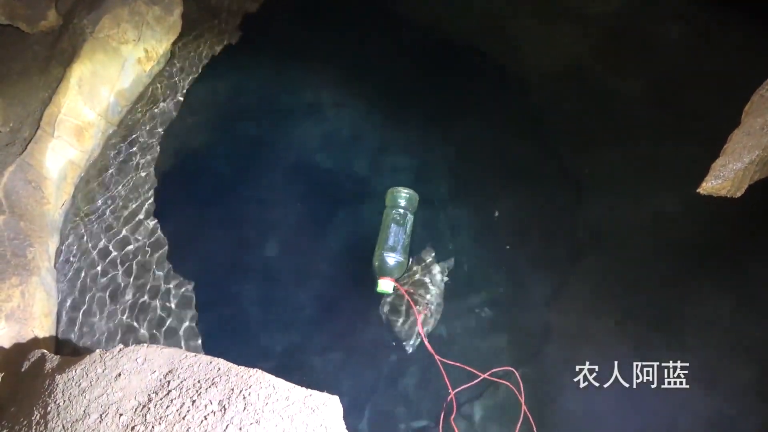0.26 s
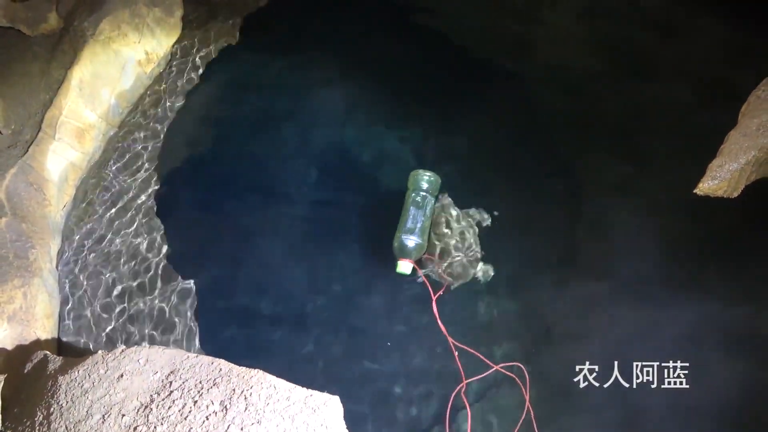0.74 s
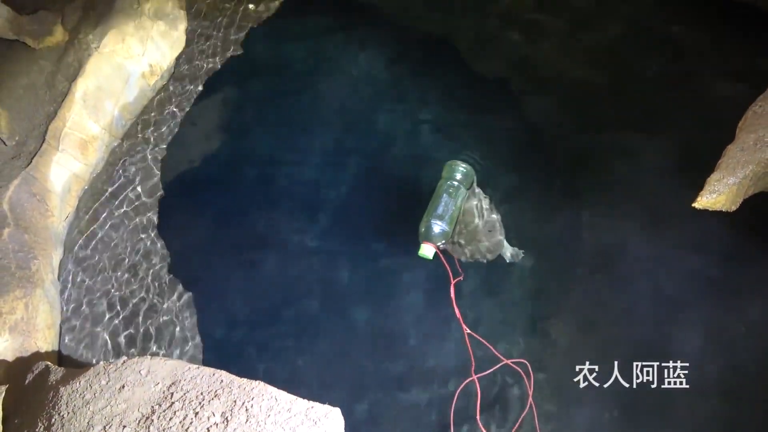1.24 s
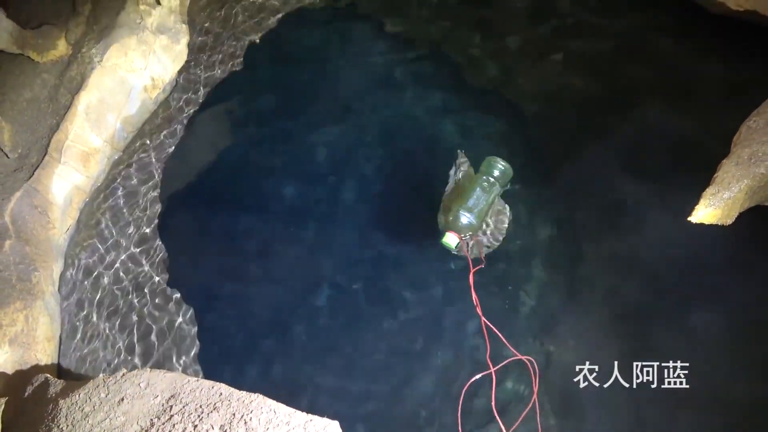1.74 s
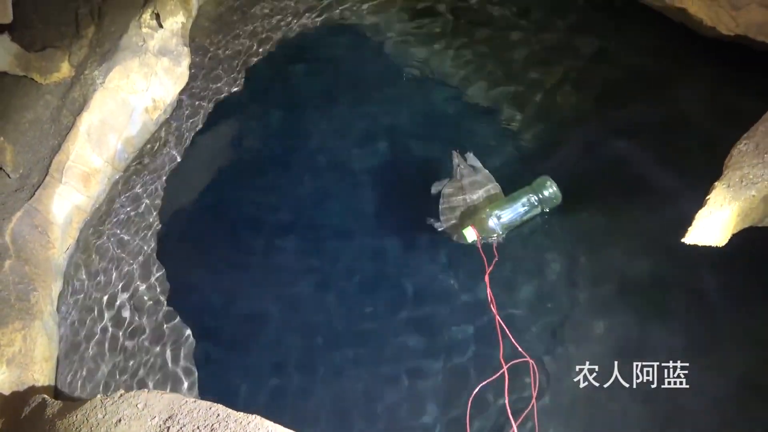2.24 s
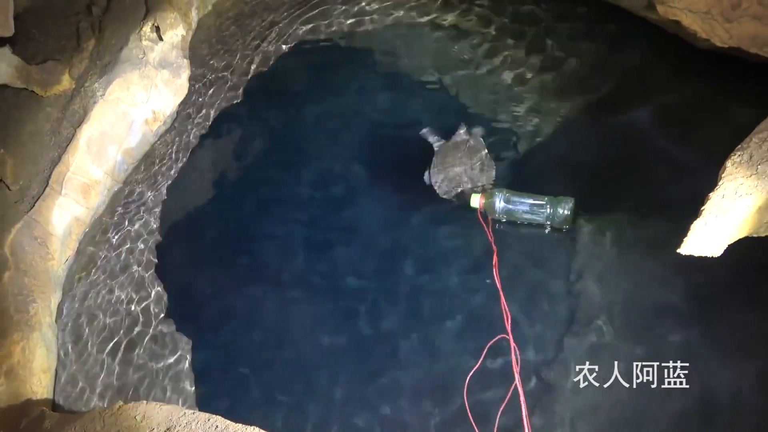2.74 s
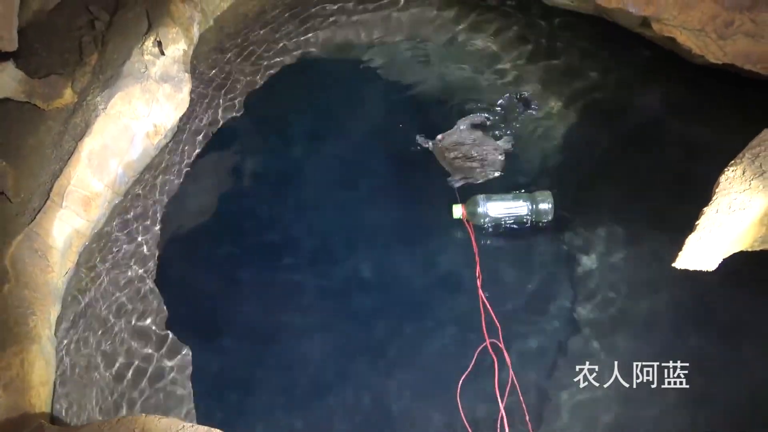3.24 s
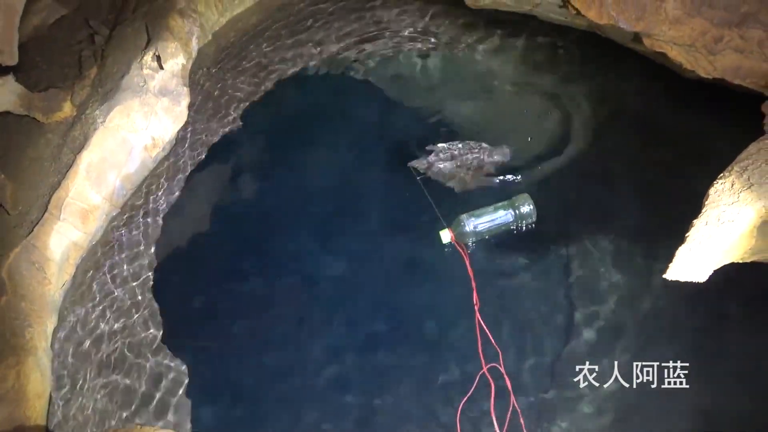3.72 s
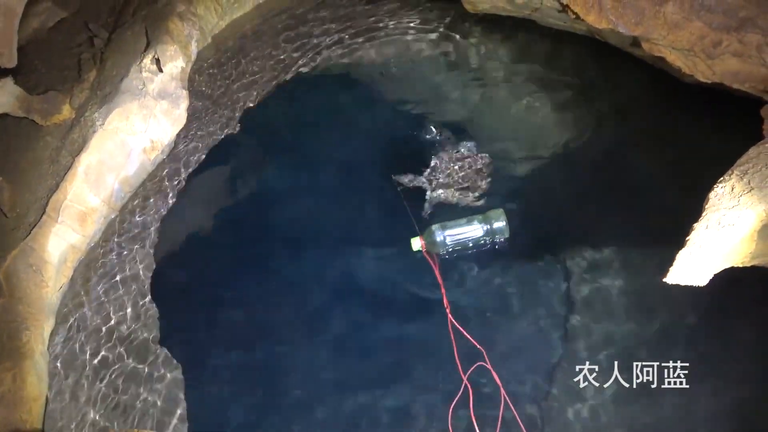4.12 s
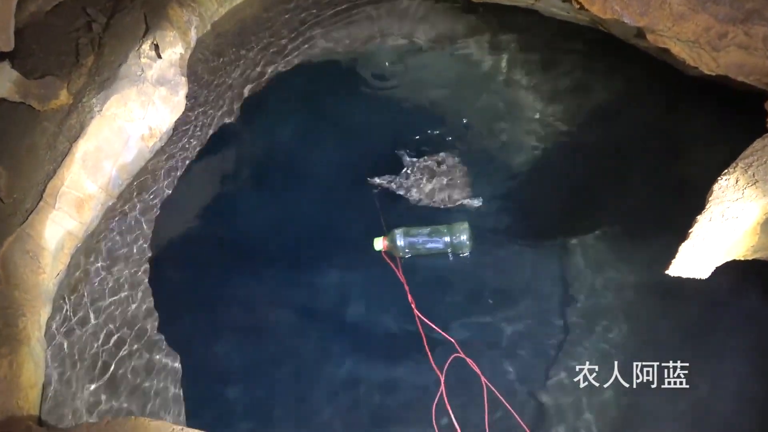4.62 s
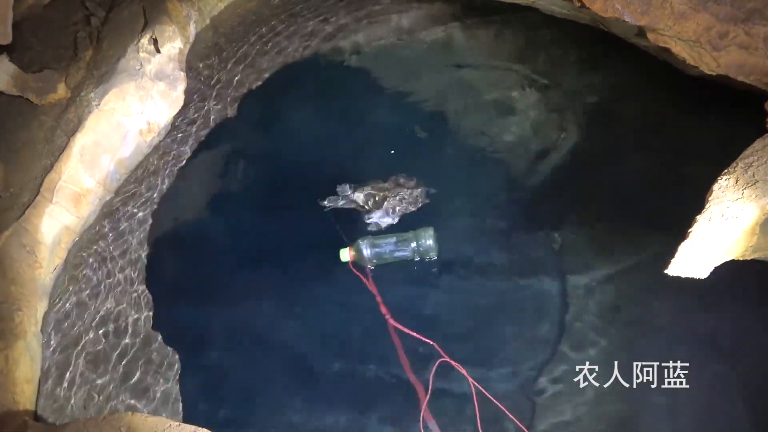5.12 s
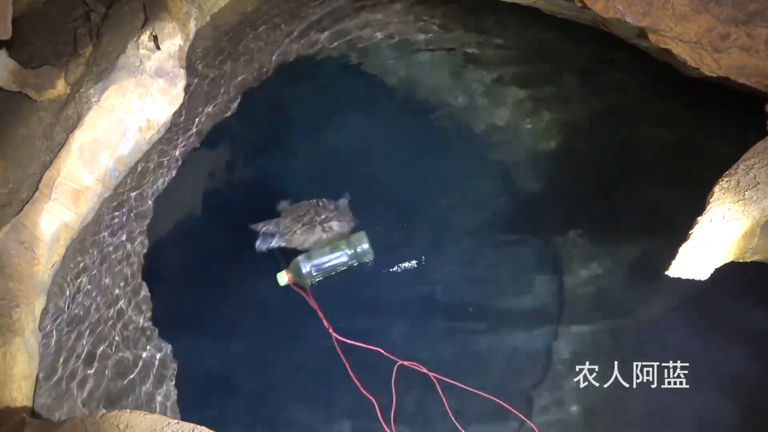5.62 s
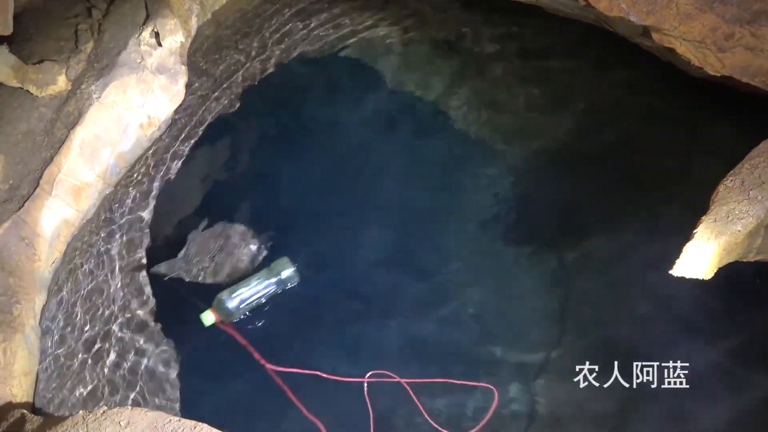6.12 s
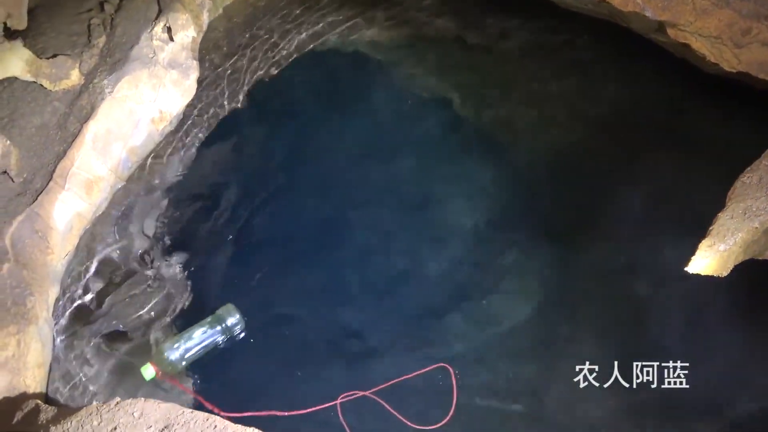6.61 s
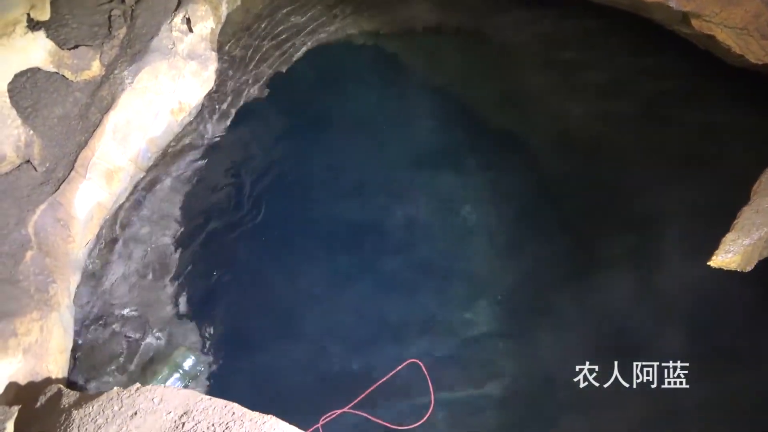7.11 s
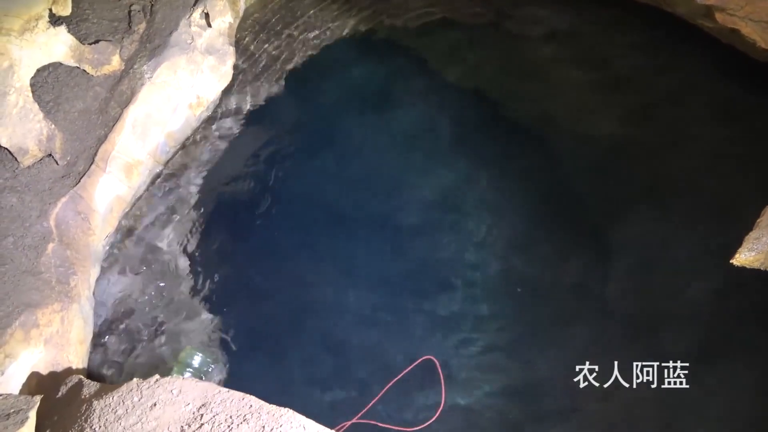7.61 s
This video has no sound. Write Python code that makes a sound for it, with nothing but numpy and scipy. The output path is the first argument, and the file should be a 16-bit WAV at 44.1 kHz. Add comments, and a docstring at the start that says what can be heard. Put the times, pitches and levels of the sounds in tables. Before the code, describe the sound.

Bright drops ring in a rocky pool, a dry snap, hollow knocks, then bursts of plopping, bubbling and fizzing over thin electrical whine.

```python
"""A turtle paddles in a small rock pool inside a cave, beside a floating plastic bottle.
A low hush and a thin electrical whine run throughout. At first drops plink as trapped bubbles ring,
spray ticks, low slops surge and one dry snap cracks close by; then hollow knocks sound as resonant modes.
From about three seconds, repeated strokes bring clusters of plops, three-bubble glugs, gurgle and fizz,
with more drops between them; delayed copies and decaying noise give every water sound a short echo."""
import sys
import numpy as np
from scipy import signal
from scipy.fft import rfft, irfft
from scipy.io import wavfile
from scipy.ndimage import uniform_filter1d

SR = 44100
rng = np.random.default_rng(int(sys.argv[2]) if len(sys.argv) > 2 else 0)


def transcribe(u):
    """Save the signal u as a 16-bit wav file named by the first command-line argument.

    u: samples, shape (n,) or (channels, n), limited to [-1, 1]; the rate is SR.
    q: integer samples, one column per channel.
    """
    v = np.clip(np.atleast_2d(u).T, -1, 1)
    q = np.round(v * 32767).astype(np.int16)
    wavfile.write(sys.argv[1], SR, q)


N = 346493
TIME = np.arange(N) / SR
EDGE_HZ = 16000  # recorder's upper band edge, also the highest starting pitch of the froth


def amp(db):
    """Decibel law: 20 dB is a factor of ten in amplitude."""
    return 10 ** (np.asarray(db) / 20)


def unit(x):
    """Power normalization: scales to rms 1."""
    return x / np.sqrt(np.mean(x ** 2) + 1e-20)


def read(points, hz):
    """Logarithmic frequency scale: interpolates a spectrum table along it."""
    f, value = np.transpose(points)
    return np.interp(np.log(hz + 1), np.log(f + 1), value)


def curve(rows, column=1):
    """Linear interpolation in time: one column of a table, at every sample."""
    rows = np.array(rows)
    return np.interp(TIME, rows[:, 0], rows[:, column])


def add(mix, s, sound):
    """Superposition: lays a sound into the mix at s seconds."""
    part = mix[max(round(s * SR), 0):][:len(sound)]
    part += sound[:len(part)]


def colour(x, points):
    """Linear filtering: multiplies the spectrum by a table of gains in dB."""
    gain = amp(read(points, np.fft.rfftfreq(N, 1 / SR)))
    return irfft(rfft(x) * gain, N)


def burst(swell, decay):
    """Exponential damping: half a second of smooth swell to 1, then decay."""
    t = TIME[:SR // 2]
    rise = np.sin(np.pi / 2 * np.minimum(t / swell, 1)) ** 2
    return rise * np.exp(-np.maximum(t - swell, 0) / decay)


def random_sizes(per_s, size_db, most):
    """Poisson-like arrivals: random instants with exponential levels in dB, up to a limit."""
    arrivals = rng.random(N) < per_s / SR
    return arrivals * amp(size_db * np.minimum(rng.exponential(1, N), most))


def ring(hz, decay, swell, rise=0.04, most_rise=1.0):
    """Bubble resonance: a damped sine whose pitch climbs as the bubble nears the surface."""
    t = TIME[:SR // 5]
    pitch = hz * (1 + most_rise * np.tanh(rise * t / decay / most_rise))
    return burst(swell, decay)[:len(t)] * np.sin(2 * np.pi * np.cumsum(pitch) / SR)


# A drip's bubble swells and decays in the same number of cycles at any pitch.
DRIP_SWELL_CYCLES, DRIP_DECAY_CYCLES = 3.6, 10.5
# Swell and decay are for 1 kHz; larger, lower bubbles swell and ring longer.
BUBBLE_SWELL_S, BUBBLE_DECAY_S, BUBBLE_SIZE_POWER = 0.0025, .0055, .35
GLUG_ENDS_DB = -4  # the first and last bubble against the middle one, before the step per bubble
# Drops that hit the pool and each trap one bubble. Each row: start in seconds, starting pitch in Hz,
# ring level in dB, relative impact level in dB, impact decay time in seconds.
DRIPS = [(0.1922, 5380, -35.5, -36, 0.0007), (0.8059, 1710, -23, -36, 0.0055),
         (1.1055, 1406, -52, -42, 0.0012), (1.259, 3020, -46, -44, 0.0041),
         (1.3461, 3230, -50.5, -35, 0.00096), (2.1466, 4555, -30.5, -35, 0.0028),
         (2.3087, 8200, -43, -51, 0.00049), (4.0386, 4700, -30, -36, 0.0011),
         (4.3804, 4460, -29, -32.5, 0.0016), (4.5436, 2450, -41.5, -37, 0.00063),
         (5.466, 2320, -37.5, -43, 0.0027), (6.553, 2397, -41, -42.5, 0.00098),
         (6.77, 8830, -38.5, -38, 0.00035), (7.376, 2350, -41.5, -36.5, 0.0024)]
# Air pockets that break into three ever smaller bubbles. Each row: start in seconds, first pitch in Hz,
# level of the middle bubble in dB, gap in seconds, pitch ratio per bubble, level step in dB per bubble.
GLUGS = [(3.238, 1390, -28.5, 0.011, 1.15, -4), (3.297, 712, -33, 0.014, 1.28, -0.5),
         (4.211, 268, -35, .025, 1.15, 0.5), (4.257, 545, -25.5, .0105, 1.216, -6),
         (6.371, 798, -45, .022, 1.16, -0.5), (7.266, 1081, -33, 0.0069, 1.39, 0.5),
         (7.552, 626, -31.5, .023, 1.27, -5.5)]
# Single bubbles stirred under by the flippers. Each row: start in seconds, starting pitch in Hz,
# peak level in dB.
BUBBLES = [(.812, 1920, -37), (.824, 2055, -36.5), (1.266, 2790, -47.5), (3.202, 1398, -37),
           (3.221, 5940, -44), (3.248, 4780, -33.5), (3.301, 2910, -37), (3.3067, 9270, -26),
           (3.307, 6830, -28), (3.328, 2700, -36), (3.383, 657, -37), (3.399, 738, -31), (4.138, 1890, -46),
           (4.177, 7540, -54), (4.246, 543, -39), (4.265, 3450, -39), (4.286, 1390, -39),
           (4.294, 5580, -47.5), (4.323, 2120, -43.5), (4.325, 1520, -37), (5.364, 4730, -47),
           (5.38, 7840, -41), (5.39, 1177, -42), (5.392, 2005, -41), (6.365, 1880, -34.5),
           (6.413, 4330, -30), (6.419, 2620, -39.5), (6.445, 4770, -40), (6.711, 3210, -45.5),
           (6.713, 4400, -40), (7.099, 1283, -42.5), (7.101, 6500, -33.5), (7.23, 3920, -51),
           (7.27, 6860, -40), (7.412, 1710, -38), (7.437, 1700, -45), (7.474, 1786, -42.5),
           (7.485, 3880, -44.5), (7.52, 850, -42), (7.53, 587, -37), (7.547, 5580, -41),
           (7.583, 9840, -34.5), (7.586, 3180, -45.5), (7.626, 1070, -38)]


def all_bubbles():
    """Size scaling: rows of start s, pitch Hz, level dB, decay s and swell s; low bubbles last longer."""
    stirred = list(BUBBLES)
    for s, hz, db, gap, ratio, step_db in GLUGS:
        for k in range(3):
            level = db + step_db * (k - 1) + GLUG_ENDS_DB * abs(k - 1)
            stirred.append((s + k * gap, hz * ratio ** k, level))
    rows = [(s, hz, db, DRIP_DECAY_CYCLES / hz, DRIP_SWELL_CYCLES / hz) for s, hz, db, _, _ in DRIPS]
    for s, hz, db in stirred:
        slow = (1000 / hz) ** BUBBLE_SIZE_POWER
        rows.append((s, hz, db, BUBBLE_DECAY_S * slow, BUBBLE_SWELL_S * slow))
    return rows


def bubbles(froth_db=-10, froth_octaves=0.78, froth_tilt_db=-17, froth_cycles=5, scatter=1.6,
            spatter_s=0.0086, small_gain_db=15.0, count=14):
    """Bubble resonance: each sheds a froth of mostly higher, shorter ones; small bubbles shed the most."""
    out, t = np.zeros(N), TIME[:SR // 25]
    for s, hz, db, decay, swell in all_bubbles():
        add(out, s, amp(db) * ring(hz, decay, swell))
        for k, (size, late, phase) in enumerate(rng.random((count, 3))):
            octaves = froth_octaves * ((k + size) / count) ** 1.18 - .04
            pitch = min(hz * 2 ** octaves, EDGE_HZ)
            level = db + froth_db + froth_tilt_db * octaves
            level += small_gain_db * np.log2(min(hz, 5000) / 3000)
            shape = np.exp(-pitch * t / froth_cycles) * (1 - np.exp(-pitch * t))
            delay = swell / 2 + late ** 1.5 * (spatter_s + scatter * (swell + decay))
            add(out, s + delay, amp(level) * shape * np.sin(2 * np.pi * (pitch * t + phase)))
    return out


# Centre of the impact for a 1 kHz drip that decays in 1 ms; small, quick drops are brighter.
IMPACT_HZ, IMPACT_PITCH_POWER, IMPACT_BRIEF_POWER = 3560, 0.51, 0.31
TICK_DECAY_S, TICK_SIZE_POWER = 0.019, 0.77  # decay at 1 kHz; larger, duller drops splat for longer
# Spray striking the surface. Each row: start in seconds, relative level in dB, centre of the tick in Hz.
TICKS = [(.978, -39.5, 9300), (1.2132, -54, 2600), (2.3274, -47, 3380), (3.168, -47, 8700),
         (3.2044, -41.5, 4500), (3.3054, -25, 8300), (3.466, -42, 7750), (3.5893, -42.5, 8700),
         (3.6246, -48, 8100), (3.699, -46.5, 8600), (3.74, -46, 9000), (4.212, -41.5, 4430),
         (4.214, -31, 11100), (5.3806, -41.5, 3360), (5.526, -43.5, 10000), (6.3467, -47.5, 6800),
         (6.367, -42.5, 4000), (6.394, -36, 6960), (6.413, -35.5, 4070), (6.418, -36, 9000),
         (6.444, -38.5, 7040), (6.614, -41.5, 12100), (6.7, -44.5, 7800), (6.746, -45, 3700),
         (7.1017, -36, 8460), (7.1755, -40, 11200), (7.276, -40.5, 4060), (7.495, -39, 8700),
         (7.5843, -27, 7760)]


def all_impacts():
    """Size scaling: rows of start s, relative dB, centre Hz and decay s; brighter impacts are briefer."""
    rows = []
    for s, hz, _, db, decay in DRIPS:
        brightness = (hz / 1000) ** IMPACT_PITCH_POWER * (.001 / decay) ** IMPACT_BRIEF_POWER
        rows.append((s, db, IMPACT_HZ * brightness, decay))
    for s, db, hz in TICKS:
        rows.append((s, db, hz, TICK_DECAY_S * (1000 / hz) ** TICK_SIZE_POWER))
    return rows


def ticks(spread=1.66, level_db=-5):
    """Broadband impact: a drop's blow on the surface is a brief burst of band-passed noise."""
    out = np.zeros(N)
    for s, db, hz, decay in all_impacts():
        edges = [hz / max(spread, 1.1), min(hz * spread, SR / 2 - 2000)]
        band = signal.butter(2, edges, "band", fs=SR, output="sos")
        envelope = burst(0.00037, decay)
        tick = envelope * signal.sosfilt(band, rng.standard_normal(SR // 2))
        add(out, s, amp(db + level_db) * np.linalg.norm(envelope) * tick / np.linalg.norm(tick))
    return out


# How strongly strokes stir the surface. Each row: time of the peak in seconds, relative level in dB,
# time in seconds to build up by 8.7 dB.
STROKES = [(2.6, -57.5, 0.27), (2.885, -49.5, 0.0546), (3.235, -55.5, 0.0565), (3.334, -42.5, 0.065),
           (3.4, -49, 0.0962), (4.33, -53.5, 0.1646), (5.41, -60.5, 0.14), (6.05, -68, 0.24),
           (6.425, -51, 0.06), (7.117, -50, 0.06), (7.29, -51, 0.0454), (7.4, -50.5, 0.05),
           (7.598, -46, 0.0773)]
SETTLE, CALM_DB = 0.5, -88  # settling time as a share of the build-up; relative level of the calm pool


def stir():
    """Addition of powers: each stroke builds up and settles exponentially over the calm of the pool."""
    power = amp(CALM_DB) ** 2
    for s, db, build in STROKES:
        distance = np.maximum(s - TIME, (TIME - s) / SETTLE)
        power = power + (amp(db) * np.exp(-distance / build)) ** 2
    return np.sqrt(power)


def gurgle(per_s=170, size_db=3, low_hz=1000, high_hz=3400, level_db=-14, count=16):
    """Random superposition of resonances: middling bubbles ring while the surface is stirred."""
    pops = random_sizes(per_s, size_db, 3) * stir()
    kind, out = rng.integers(0, count, N), np.zeros(N)
    for k, hz in enumerate(np.geomspace(low_hz, high_hz, count)):
        bubble = ring(hz, DRIP_DECAY_CYCLES / hz, DRIP_SWELL_CYCLES / hz)
        out += signal.oaconvolve(pops * (kind == k), bubble / np.linalg.norm(bubble))[:N]
    return amp(level_db) * np.sqrt(SR / per_s) * out


# Colour of the fizz. Each row: frequency in Hz, gain in dB.
FIZZ_COLOUR = [(200, -3), (500, 3), (1500, 6.5), (3000, -0.5), (6000, -5.5), (11000, -8.5), (15000, -5)]


def fizz(per_s=1300, size_db=5.0, cycles=4, level_db=-4.0, count=24):
    """Random superposition of damped sines: countless tiny bubbles on the stirred surface."""
    pops = random_sizes(per_s, size_db, 4) * rng.choice([-1, 1], N)
    kind, t, out = rng.integers(0, count, N), TIME[:SR // 25], np.zeros(N)
    for k, hz in enumerate(np.geomspace(400, 14000, count)):
        bubble = hz * np.exp(-hz * t / cycles) * np.sin(2 * np.pi * hz * t)
        out += signal.oaconvolve(pops * (kind == k), bubble)[:N]
    return amp(level_db) * stir() * unit(colour(out, FIZZ_COLOUR))


# Water heaved aside by a stroke. Each row: start in seconds, level in dB, swell time in seconds,
# decay time in seconds, frequency in Hz above which it dulls.
SLOPS = [(.02, -57, 0.048, 0.26, 130), (.62, -58, 0.026, .07, 85), (1.91, -56.5, 0.027, 0.042, 2500),
         (2.943, -65, 0.024, 0.043, 600), (3.141, -57, 0.011, 0.043, 300), (3.3, -55.5, .0057, 0.045, 280),
         (4.301, -58.5, 0.013, 0.069, 400), (5.053, -54, .0084, 0.059, 5030),
         (6.244, -55, 0.0025, .075, 4000), (7.08, -62, .02, 0.049, 200), (7.38, -55, 0.05, 0.098, 191),
         (7.579, -52, 0.019, 0.15, 165)]
# Colour of the slops. Each row: frequency in Hz, relative gain in dB.
SLOP_COLOUR = [(60, -29), (130, -0.5), (220, -0.5), (380, -3.5), (700, -11.5), (2500, -18.5), (6000, -26),
               (14000, -57)]


def slops():
    """Room-mode excitation: dull surges of displaced water boom a little at the cave's standing waves."""
    out, hz = np.zeros(N), np.fft.rfftfreq(SR // 2, 1 / SR)
    shape = unit(amp(standing_waves(hz) + read(SLOP_COLOUR, hz)))
    for s, db, swell, decay, top_hz in SLOPS:
        dulling = np.sqrt(1 + (hz / top_hz) ** 6)
        boom = irfft(rfft(rng.standard_normal(SR // 2)) * shape / dulling, SR // 2)
        add(out, s, amp(db) * burst(swell, decay) * boom)
    return out


# Hollow knocks and scuffs. Each row: start in seconds, relative level in dB, swell time in seconds,
# decay time in seconds, tilt in dB per octave.
KNOCKS = [(2.675, -35, 0.0011, 0.0064, 6.5), (2.699, -45.5, 0.0014, 0.022, -44),
          (2.737, -52, 0.0013, 0.0044, 4), (2.853, -43, 0.00167, 0.0073, -1),
          (2.869, -39.5, 0.004, 0.016, -10)]
# Modes they ring with. Each row: frequency in Hz, width in Hz, relative level in dB.
HOLLOW = [(408, 33, -0.5), (513, 15.5, 2), (667, 65, -0.5), (990, 73, -4), (1390, 32, -1), (1543, 53, -0.5),
          (1870, 130, 3), (2080, 180, -4), (2360, 110, 3.5), (3120, 250, -40)]


def knocks(level_db=-2, blow=0.49):
    """Modal excitation: a blow and a scuff ring a hollow body; briefer contacts are more blow."""
    out, t = np.zeros(N), TIME[:SR // 8]
    for s, db, swell, decay, tilt in KNOCKS:
        body = np.zeros(len(t))
        for k, (hz, width, level) in enumerate(HOLLOW):
            gain = (-1) ** k * amp(level + tilt * np.log2(hz / 1000)) * np.sqrt(width)
            body += gain * np.exp(-np.pi * width * t) * np.sin(2 * np.pi * hz * t)
        envelope = burst(swell, decay)
        contact = envelope * rng.standard_normal(SR // 2)
        contact[round(swell * SR)] += blow / np.sqrt(decay)
        sound = signal.fftconvolve(contact, body)
        add(out, s, amp(db + level_db) * np.linalg.norm(envelope) * sound / np.linalg.norm(sound))
    # a small body radiates no bass
    return signal.sosfilt(signal.butter(2, 280, "high", fs=SR, output="sos"), out)


# One dry snap close to the microphone: start in seconds, level in dB before colouring,
# decay time in seconds.
SNAP = (.5393, -32, 0.0019)
# Colour of the snap. Each row: frequency in Hz, gain in dB.
SNAP_COLOUR = [(300, -40), (1200, 1.5), (2500, 2), (3400, -6.5), (4400, 5), (6000, -10), (9500, -0.5),
               (15000, -12)]


def snap():
    """Transient noise: a tiny crack of random signs with a rapid exponential decay."""
    out = np.zeros(N)
    s, db, decay = SNAP
    add(out, s, amp(db) * burst(0.00013, decay) * rng.choice([-1, 1], SR // 2))
    return colour(out, SNAP_COLOUR)


def far_drips(per_s=14, size_db=4, level_db=-73):
    """Random impulses: faint high ticks from droplets all round the cave."""
    drops = random_sizes(per_s, size_db, 3)
    tick_colour = [(1500, -40), (5000, -11), (10000, -22), (15000, 19.5)]  # (Hz, dB)
    return amp(level_db) * unit(colour(drops, tick_colour))


# Decay of the near tail. Each row: frequency in Hz, time in seconds to fall by 60 dB.
CAVE = [(150, 0.14), (600, 0.24), (1800, 0.25), (5000, 0.22), (9000, 0.2), (15000, 0.014)]
# First echoes. Each row: delay in seconds, gain relative to the direct sound.
WALLS = [(.0058, 0.2), (.0098, 0.26), (.0121, 0.22), (0.0199, .2), (.0335, .24)]


def cave(x, tail_db=-3, deep_db=-20, deep_t60=0.87, onset=0.00094, width=0.19):
    """Reverberation: early echoes off the nearest rock, a short dense tail, a faint longer one from deep."""
    t = TIME[:SR]
    taps = rng.choice([-1., 1.], (2, SR)) * (rng.random((2, SR)) < 4000 / SR)
    hz, frame_s, z = signal.stft(taps, SR, nperseg=256)
    decay = amp(-60 * frame_s / read(CAVE, hz)[:, None])
    near = signal.istft(z * decay, SR, nperseg=256)[1][:, :SR]
    near = near * (1 - np.exp(-t / onset))
    deep = taps[:, ::-1] * amp(-60 * t / deep_t60)
    mid, side = (amp(tail_db) * unit(near) + amp(deep_db) * unit(deep)) / np.sqrt(SR)
    mid[0] += 1  # direct sound
    for delay, gain in WALLS:
        mid[round(delay * SR)] += gain
    mid, side = (signal.fftconvolve(x, response)[:N] for response in (mid, side))
    # frequency shaping of the difference between the two microphones
    side = width * colour(side, [(300, 3.5), (1600, 3), (4000, -3), (10000, 14.5)])
    return np.array([mid + side, mid - side])


# Standing waves of the cave. Each row: frequency in Hz, width in Hz, lift in dB.
AIR_MODES = [(76.6, 9.3, 9.5), (108.4, 9, 4), (140, 15.4, 9.5), (206.6, 5.3, 10), (774.7, 19, 10),
             (1028, 12, 9.5)]


def standing_waves(hz):
    """Modal resonance: how much the cave lifts each frequency, in dB."""
    return sum(lift / (1 + (2 * (hz - f) / width) ** 2) for f, width, lift in AIR_MODES)


# Hush spectrum before the standing waves. Each row: frequency in Hz, relative density in dB per Hz.
HUSH = [(10, -23), (22, 1), (45, 2), (120, -0.5), (400, 2), (1200, 0), (1600, -9.5), (4200, -13),
        (6500, -9.5), (14000, -12.5), (15500, -44)]
# Hush level over time. Each row: time in seconds, level in dB against the mid signal in 300 to 1200 Hz.
HUSH_DB = [(0, -65.5), (3.3, -65), (4.8, -65), (7, -66), (7.86, -65.5)]
# Stereo likeness of the hush. Each row: frequency in Hz, left-right correlation.
HUSH_SAME = [(30, 1), (120, 0.65), (500, 0.47), (1500, 0.78), (4000, 0.95), (12000, 0.07)]


def hush(level_db=0):
    """Partly coherent noise: the cave's air, lifted at its standing waves and shared by both sides."""
    hz = np.fft.rfftfreq(N, 1 / SR)
    same = np.clip(read(HUSH_SAME, hz), 0, 1)
    shape_db = read(HUSH, hz) + standing_waves(hz)
    noise = rfft(rng.standard_normal((2, N))) * amp(shape_db)
    mid, side = noise * np.sqrt([1 + same, 1 - same])
    body = np.std(irfft(mid * ((hz > 300) & (hz < 1200)), N))
    return irfft(np.array([mid + side, mid - side]), N) / body * amp(curve(HUSH_DB) + level_db)


WHINE_HZ = 15686  # mean pitch
# Course of the whine. Each row: time in seconds, relative level in dB, left minus right in dB.
WHINE = [(0, -55.5, 6.0), (0.7, -54, 2.5), (1.7, -55.0, 1), (2.3, -57, 6), (2.8, -59, 7), (3.15, -56.5, 3),
         (3.5, -62.0, 10), (4.1, -56.5, 2), (4.7, -55, 7), (5.6, -56.5, 4), (6.7, -60.5, 10.5),
         (7.2, -56.5, 8), (7.86, -56, 9)]


def whine(waver_hz=3.5, flutter_db=1.4, level_db=1):
    """Frequency and amplitude modulation: a thin electrical tone wavers and shifts between the sides."""
    drift, *flutter = unit(uniform_filter1d(rng.standard_normal((3, N)), size=6000))
    tone = np.sqrt(2) * np.sin(2 * np.pi * np.cumsum(WHINE_HZ + waver_hz * drift) / SR)
    pan = curve(WHINE, 2)
    side_db = flutter_db * np.array(flutter) + np.array([pan, -pan]) / 2
    return tone * amp(curve(WHINE) + level_db + side_db)


def scene():
    """Superposition: water reverberates in the cave; the near snap is mostly direct."""
    water = bubbles() + ticks() + knocks() + slops() + fizz() + gurgle() + far_drips()
    near = snap()
    return cave(water + amp(-9.5) * near) + near + hush() + whine()


def record(dry):
    """Band limitation: the recorder's linear-phase low-pass."""
    low_pass = signal.firwin(1023, EDGE_HZ, window=("kaiser", 9), fs=SR)
    return signal.oaconvolve(dry, low_pass[None], "same")


dry = scene()
out = record(dry)
transcribe(out)
```